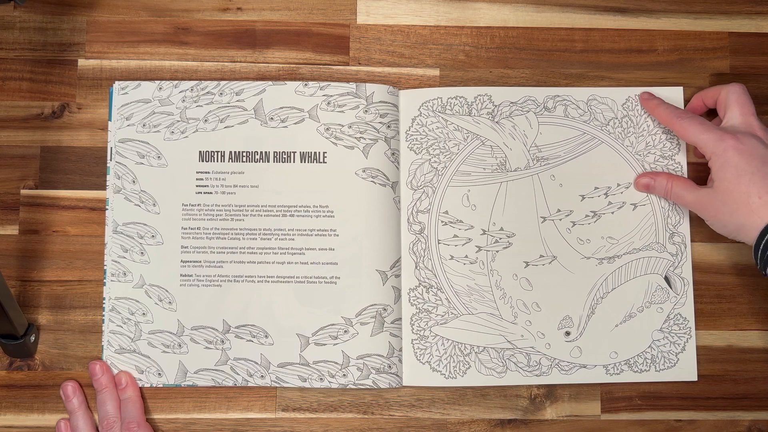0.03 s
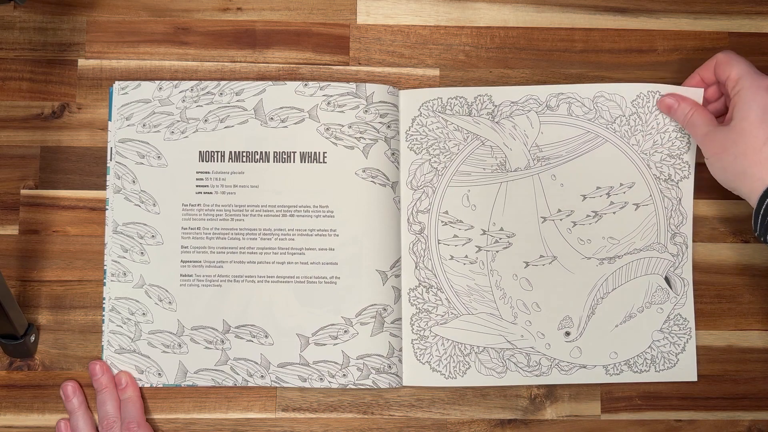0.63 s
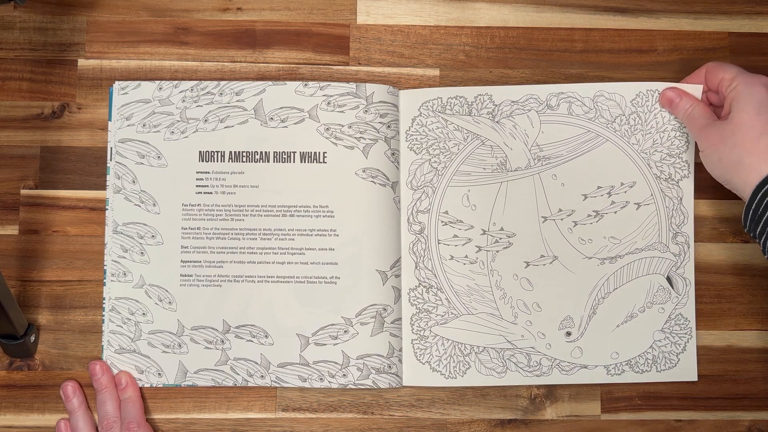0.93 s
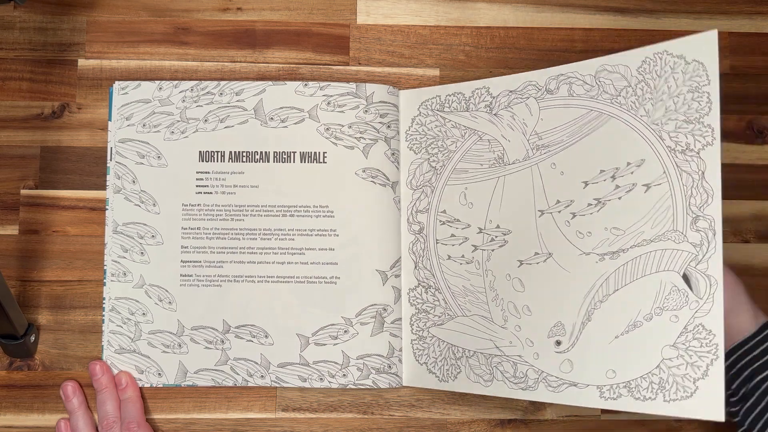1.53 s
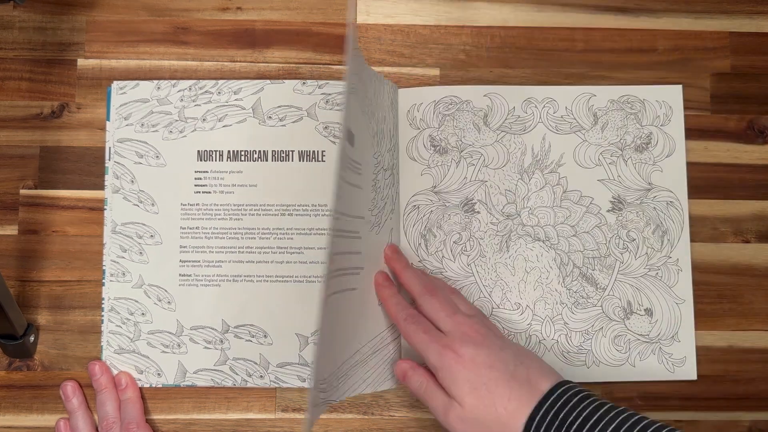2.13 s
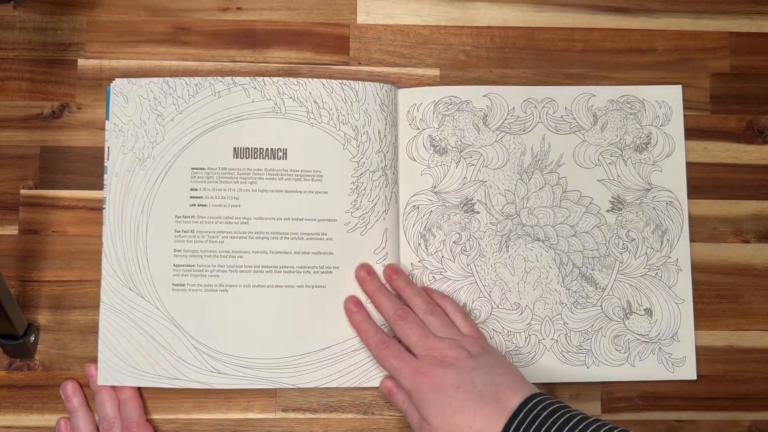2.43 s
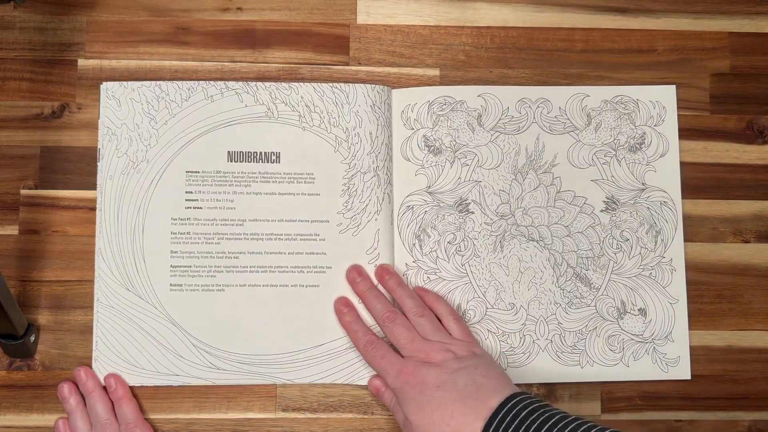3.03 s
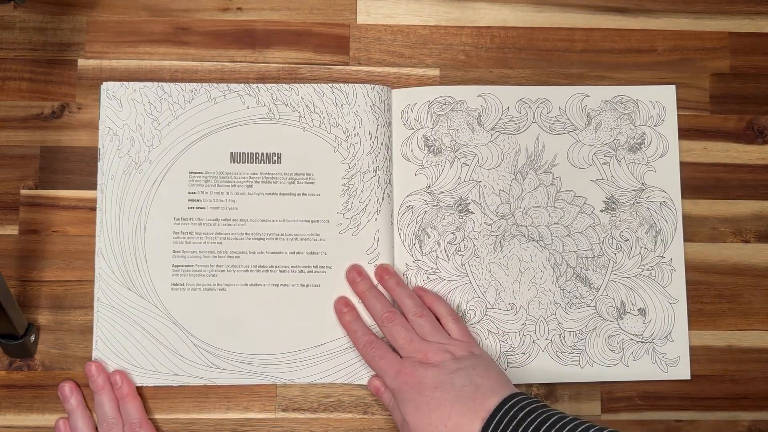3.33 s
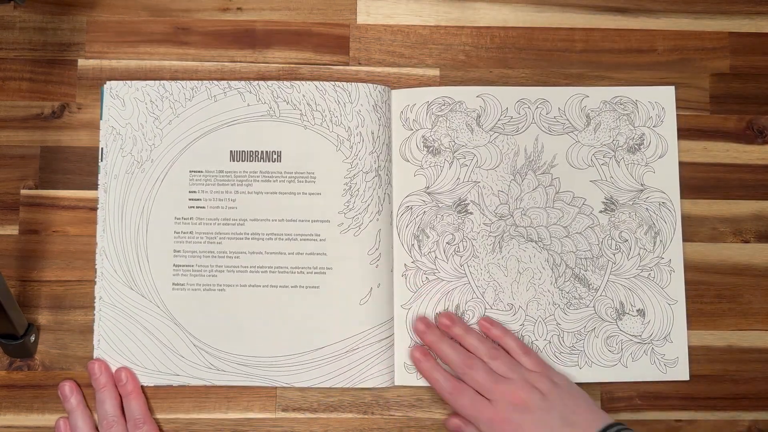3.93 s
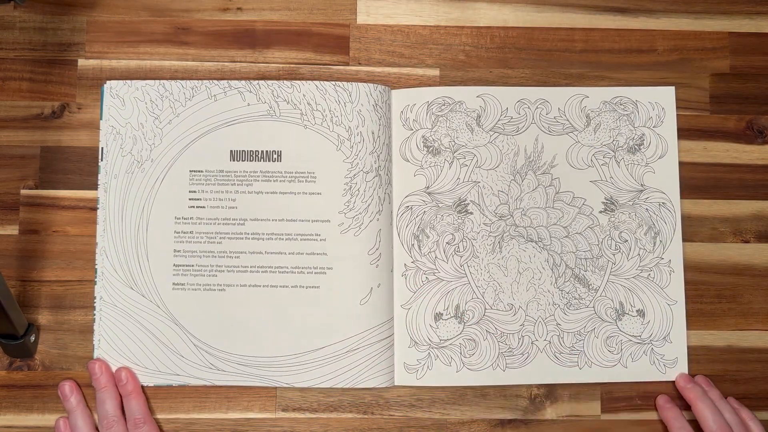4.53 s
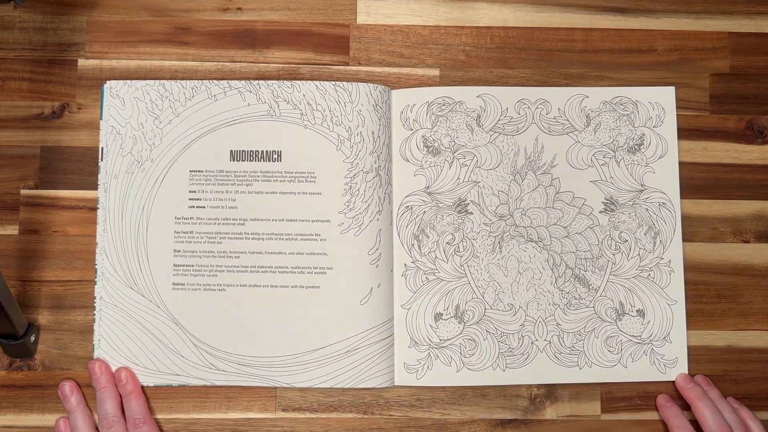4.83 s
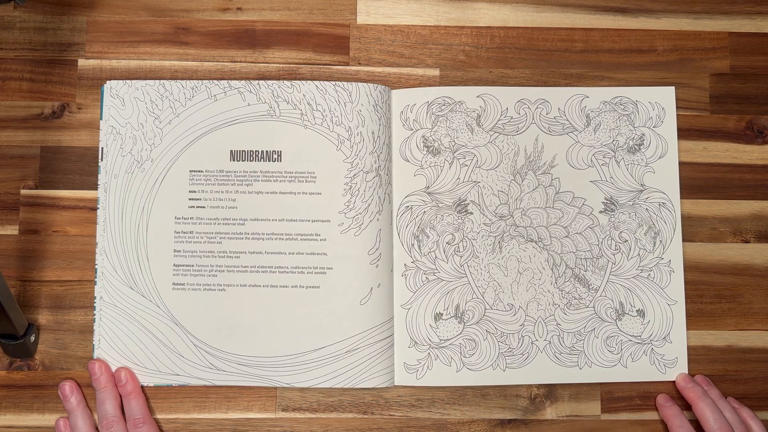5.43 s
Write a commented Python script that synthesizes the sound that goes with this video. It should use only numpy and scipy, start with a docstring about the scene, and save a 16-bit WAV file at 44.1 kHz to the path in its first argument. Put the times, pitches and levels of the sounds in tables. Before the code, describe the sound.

A low ventilation hum and faint hiss run throughout in a quiet room. From about 0.4 seconds a finger rubs the corner of a stiff book page, with small crackles and soft bumps, flicking it free with a sharp snap at 0.8. The hand slides under the sheet with a light hiss. Near 1.5 seconds the paper bends, then buckles at 1.7 in a loud, hollow cluster of pops. It swishes over with a slight rasp, flaps again at 2.1 and lands on a soft puff of air around 2.4. Faint ticks and low palm presses follow, the book resting on a wooden table. From 3.7 seconds the paper pats down and the hand brushes off the page, ending with a bright fingernail tick slightly to the right at 4.3. Everything sounds close, and only the room hum and hiss remain until about 5.5 seconds.

```python
"""A low ventilation hum and faint hiss fill a quiet room; then one stiff page of a large book is turned.
A finger rubs and flicks the corner free, and the hand slides under the sheet, which bends, buckles,
flips over and lands on a puff of air. The hand brushes off the page and a nail ticks its edge.
Friction is heard as streams of tiny clicks, sudden release as damped pulses; these excite the
resonances of the room and of the wooden table under the book."""
import sys
import numpy as np
from scipy import signal
from scipy.fft import rfft, irfft
from scipy.io import wavfile

SR = 44100
rng = np.random.default_rng(int(sys.argv[2]) if len(sys.argv) > 2 else 0)


def materialize(psi):
    """Save the field psi as 16-bit PCM at rate SR to the path in sys.argv[1].

    A 1-D psi becomes a single channel; in a 2-D psi each row is a channel.
    """
    bounded = np.clip(np.atleast_2d(psi).T, -1, 1)
    quanta = np.round(bounded * 32767).astype(np.int16)
    wavfile.write(sys.argv[1], SR, quanta)


N = 250488
T = np.arange(N) / SR
BIN_HZ = np.fft.rfftfreq(N, 1 / SR)


def from_db(db):
    return 10 ** (np.asarray(db) / 20)


def rms_one(x):
    return x / np.sqrt(np.mean(x ** 2) + 1e-20)


def add(out, x, s):
    """Superposition: mix x in from time s."""
    i = int(s * SR)
    out[i:i + len(x)] += x[:N - i]


def colour(x, spectrum):
    """Spectral shaping, falling 20 dB per octave beyond the given points; rms 1."""
    hz, db = np.transpose(spectrum)
    octave, points = np.log2(BIN_HZ + 1), np.log2(hz)
    beyond = abs(octave - np.clip(octave, points[0], points[-1]))
    return rms_one(irfft(rfft(x) * from_db(np.interp(octave, points, db) - 20 * beyond), N))


def band(x, low_hz, high_hz, order=2):
    """Causal band-pass filter."""
    sos = signal.butter(order, [low_hz, min(high_hz, .45 * SR)], "band", fs=SR, output="sos")
    return signal.sosfilt(sos, x)


def drift(per_s):
    """Slow random modulation; rms 1."""
    knots = rng.standard_normal(1 << 14)
    return rms_one(np.interp(T * per_s, np.arange(len(knots)), knots))


def grains(per_s, spread_db):
    """Stick-slip friction: fibres catch and let go in random, uneven clicks; rms 1."""
    sizes = from_db(spread_db * np.minimum(rng.exponential(1, N), 4)) * rng.choice([-1, 1], N)
    return rms_one(sizes * (rng.random(N) < per_s / SR))


def ring(x, hz, t60):
    """A damped resonator with unit gain at its peak."""
    r = from_db(-60 / (t60 * SR))
    feedback = [1, -2 * r * np.cos(2 * np.pi * hz / SR), r * r]
    return signal.lfilter(np.array([1, 0, -1]) * (1 - r * r) / 2, feedback, x + 1e-18)


def burst(envelope, low_hz, high_hz, order=2):
    """Tiny slips sum to band-limited noise with the energy of the envelope."""
    x = band(envelope * rng.choice([-1, 1], len(envelope)), low_hz, high_hz, order)
    return rms_one(x) * np.sqrt(np.mean(envelope ** 2))


def pulse(hz, ratio, order=2):
    """Impulse response of a band around hz: a few damped swings; peak 1."""
    ratio = max(ratio, 1.1)
    x = band(1. * (T[:SR // 10] == 0), hz / ratio, hz * ratio, order)
    return x / abs(x).max()


def strokes(rows):
    """Incoherent strokes rise, hold, fade and add in power; one gain curve per level column."""
    power = 0
    for s, rise_s, hold_s, fade_s, *db in rows:
        rise = np.clip((T - s) / rise_s, 0, 1)
        fade = np.exp(-np.maximum(T - s - rise_s - hold_s, 0) / fade_s)
        power = power + np.outer(from_db(db), rise * fade + 1e-9) ** 2
    return np.sqrt(power)


# Ventilation tones. Each row: frequency in Hz, rms level in dB.
HUM_TONES = [(60, -63.5), (99.5, -82), (119.5, -75.5), (197.5, -77.5), (297, -82), (359, -85.5)]
# Spectra of the rumble and its diffuse part. Each row: frequency in Hz, relative level in dB.
RUMBLE_SPECTRUM = [(20, -40), (32, -21), (45, -13.5), (62, -1.5), (85, -8), (150, -19.5), (250, -25),
                   (350, -31.5), (500, -36), (800, -43.5), (1400, -48), (3000, -56)]
DIFFUSE_SPECTRUM = [(40, -6.5), (70, -1), (130, -3), (200, -2), (350, -5), (550, -6.5), (900, -10.5),
                    (1500, -22), (3500, -24.5)]

def ventilation():
    """Wavering tones over broadband rumble, whose diffuse part differs between the channels."""
    hum = 0
    for hz, db in HUM_TONES:
        amplitude = from_db(db) * np.sqrt(2) * (1 + 0.073 * drift(5.8))
        hum += amplitude * np.sin(2 * np.pi * hz * T + .5 * drift(2.7))
    rumble = from_db(-61.5) * colour(rng.standard_normal(N), RUMBLE_SPECTRUM)
    diffuse = from_db(-75.5) * colour(rng.standard_normal(N), DIFFUSE_SPECTRUM)
    return hum + rumble + diffuse * [[1], [-1]]


# Faint hiss with a gap around 10-13 kHz. Each row: frequency in Hz, relative level in dB.
HISS_SPECTRUM = [(1000, -22), (2000, -11), (3000, -3), (3900, 1), (5000, -9), (6500, 3.5), (8000, 5),
                 (9300, -7), (10300, -24), (12000, -29.5), (15000, -6)]

def background_hiss():
    """Partly coherent noise: one part common to both channels, a weaker part independent."""
    common = from_db(-69) * colour(rng.standard_normal(N), HISS_SPECTRUM)
    return common + from_db(-81) * colour(rng.standard_normal((2, N)), HISS_SPECTRUM)


def room(x, early_db=-15, tail_db=-13, early_s=0.013, t60_s=0.3, treble_db=-4):
    """Reverberation: early reflections off the table, then a short exponential tail."""
    t = T[:SR // 2]
    def reflections():
        echoes = rng.standard_normal((2, len(t))) * (t > .0012)
        early = from_db(early_db) * rms_one(echoes[0] * np.exp(-t / early_s))
        tail = from_db(tail_db) * rms_one(echoes[1] * from_db(-60 * t / t60_s))
        response = (early + tail) / np.sqrt(len(t))
        dull = band(response, 123.2, 4200, order=1)
        return signal.fftconvolve(x, dull + from_db(treble_db) * (response - dull))[:N]
    lateral = reflections()
    side = from_db(5) * band(lateral, 610, 1300, order=1) + from_db(-24.5) * lateral
    return reflections() + side * [[1], [-1]]


# Room resonances. Each row: frequency in Hz, gain in dB, time to fall 60 dB in seconds.
ROOM_MODES = [(472, -7, 0.23), (492, -1, 0.26), (539, 5, 0.18), (620, -7, .25), (682, 1.5, 0.16),
              (830, -2.5, .25), (880, -12, 0.24), (944, -8.5, .18), (1078, -5, .22), (1145, -8.5, .2),
              (1310, -4, .17), (1420, -5.5, 0.11), (1690, -6, 0.11)]

def room_ring(x):
    """Resonance: the room rings briefly after each movement of the page."""
    return x + sum(from_db(db) * ring(x, hz, t60) for hz, db, t60 in ROOM_MODES)


def spread(x, hiss_db=-7, body_db=-9, span_s=0.0013):
    """An extended source: paths from across the page differ a little between the channels."""
    paths = rng.standard_normal(SR // 50) * np.exp(-T[:SR // 50] / span_s)
    wide = from_db(hiss_db) * band(x, 2900, 7000) + from_db(body_db) * band(x, 500, 1000)
    return x + signal.fftconvolve(wide, paths / np.linalg.norm(paths))[:N] * [[1], [-1]]


def from_right(x, lag_s=0.00044):
    """Path difference: sound from the right reaches the left channel later."""
    return np.array([np.interp(T - lag_s, T, x), x])


# Modes of the wood. Each row: frequency in Hz, gain in dB, time to fall 60 dB in seconds.
TABLE_MODES = [(196.5, 6, 0.82), (305, -2, 0.41), (338, 5.5, 0.34), (377, -6.5, 0.3)]

def table_top(x):
    """Forced vibration: whatever touches the book excites the table's modes."""
    return x + sum(from_db(db) * ring(x, hz, t60) for hz, db, t60 in TABLE_MODES)


# Bumps of the hand. Each row: centre in seconds, level in dB, half-width in seconds,
# frequency near the top of the band in Hz.
HAND_BUMPS = [(0.45, -51, 0.036, 58), (0.56, -55, 0.028, 58.4), (0.775, -50, 0.086, 59),
              (1.524, -55, 0.067, 62), (3.389, -50.5, 0.026, 65.3), (3.818, -54, 0.013, 70)]

def thumps():
    """Soft impact: the hand's long contact with the book excites only low frequencies."""
    return sum(from_db(db) * burst(np.exp(-((T - s) / width_s) ** 2) + 1e-9, hz / 8, hz * 1.13)
               for s, db, width_s, hz in HAND_BUMPS)


# Palm presses. Each row: start, rise, hold and fade in seconds, level in dB.
PALM_PRESSES = [(2.58, 0.22, 0.38, 0.13, -62), (3.42, 0.064, 0.088, 0.13, -60),
                (3.72, 0.04, 0.061, 0.062, -62), (4.14, 0.087, 0.035, 0.05, -63.5)]
# Their spectrum. Each row: frequency in Hz, relative level in dB.
PALM_SPECTRUM = [(40, -11), (70, 14.5), (130, -25.5), (200, -1), (330, -10.5), (520, -24.5), (900, -38)]

def palm():
    """Soft friction: the palm shifting on the book makes low noise."""
    return strokes(PALM_PRESSES)[0] * colour(rng.standard_normal(N), PALM_SPECTRUM)


# The sliding edge catching. Each row: start, rise, hold and fade in seconds, rasp and whistle in dB.
EDGE_RASPS = [(1.74, 0.07, 0.14, 0.07, -65, -73), (2.17, 0.07, 0.035, .008, -74, -68),
              (2.325, 0.006, 0.094, 0.016, -74, -66)]

def rasp(coarse_hz=480, whistle_hz=130, glide_hz_per_s=400):
    """Uneven stick-slip puts sidebands around a rising rate: wide ones rasp, narrow ones whistle."""
    hz = 4400 + glide_hz_per_s * (T - 1.9)
    cycle = np.cos(2 * np.pi * np.cumsum(hz) / SR)
    return sum(gain * rms_one(band(grains(4300, 3), 8.6, half_width_hz) * cycle)
               for gain, half_width_hz in zip(strokes(EDGE_RASPS), (coarse_hz, whistle_hz)))


def shimmer(x, bands=14, depth_db=2.5, shifts_per_s=30):
    """Amplitude modulation: the hiss shimmers as its bands swell and fade at random; rms 1."""
    band_of_bin = np.searchsorted(np.geomspace(2000, 11000, bands - 1), BIN_HZ)
    spectrum = rfft(x)
    parts = (irfft(spectrum * (band_of_bin == k), N) for k in range(bands))
    return rms_one(sum(part * from_db(depth_db * drift(shifts_per_s)) for part in parts))


# The sheet swinging over. Each row: time in seconds, level in dB before each layer's offset.
SWING_LEVELS = [(1.66, -51), (1.842, -53.5), (1.848, -54.5), (2.14, -59), (2.162, -55.5), (2.278, -65),
                (2.29, -66)]

def swing_gain(edge_s=0.016):
    """Friction noise follows the sheet's speed, dying away outside the swing."""
    s, db = np.transpose(SWING_LEVELS)
    return from_db(np.interp(T, s, db)) * np.exp(-abs(T - np.clip(T, s[0], s[-1])) / edge_s)


# Rubbing strokes. Each row: start, rise, hold and fade in seconds, then the named levels in dB.
FINGER_STROKES = [(.38, 0.096, 0.03, 0.018, -90, -64.5), (.523, 0.0029, 0.067, 0.041, -60, -54.5),
                  (.59, 0.036, 0.053, 0.0083, -58, -73), (.72, .015, 0.039, 0.01484, -69, -85),
                  (.824, 0.0028, 0.0032, 0.05, -48, -80), (.925, 0.05, 0.0033, 0.02, -58.5, -58.5),
                  (1.0, 0.028, 0.53, .05, -80, -66.5), (1.17, 0.064, .01, 0.036, -76, -61)]  # at the corner and under the page: rub, skin hiss
SHEET_DRAGS = [(1.46, 0.016, 0.063, 0.042, -57, -70, -55.5),
               (1.545, 0.0058, 0.064, 0.025, -52.5, -52.5, -57.5),
               (1.63, 0.0035, 0.0064, 0.016, -46.5, -51.5, -50),
               (2.07, 0.011, 0.19, 0.019, -61.5, -82, -67),
               (2.324, 0.0023, 0.067, 0.13, -65.5, -63.5, -61.5),
               (2.66, 0.08, 0.0024, 0.018, -63, -62, -81.5)]  # over the next page: crease, hiss, wobble
HAND_BRUSHES = [(3.745, 0.042, 0.047, 0.04, -59, -70.5), (3.83, 0.095, 0.059, 0.1, -59, -75),
                (4.10, 0.15, 0.022, 0.022, -64, -79)]  # off the new page: hiss, rub
# Spectra of the friction layers. Each row: frequency in Hz, relative level in dB.
CORNER_SPECTRUM = [(150, -13), (300, 3), (700, -23), (1400, -10.5), (1800, -6), (2150, 0.5), (2750, -1),
                   (3300, -10.5), (4200, -12.5), (5800, -7.5), (9300, -9.5), (12000, -49.5)]
CREASE_SPECTRUM = [(700, -18), (1400, -4), (2200, 1.5), (3000, -1.5), (4200, -5), (5500, -5.5),
                   (9300, -6.5), (12000, -26)]
SLIDE_SPECTRUM = [(300, -30), (700, -22), (1400, -10), (2200, -12.5), (3200, -6.5), (4300, -5), (5300, -1),
                  (7500, 2), (9300, 4), (11500, -11.5), (15000, -5), (16000, 2.5)]
BEND_SPECTRUM = [(30, -15), (60, -6.5), (180, 7), (300, 1), (500, -7), (720, -2), (1000, -7), (1500, -9),
                 (2500, -32.5)]
BRUSH_SPECTRUM = [(150, -7.5), (330, 3), (600, -19), (1400, -14), (2200, -13), (4300, -14), (5500, -7),
                  (7500, -1.5), (9300, -0.5), (11500, -11), (15000, -3), (16000, -5)]

def friction():
    """Dense stick-slip clicks merge into rubbing noise; fluttering pressure modulates the hiss."""
    rub, skin = strokes(FINGER_STROKES)
    creasing, drag, wobble = strokes(SHEET_DRAGS)
    brushing, brush_rub = strokes(HAND_BRUSHES)
    swing = swing_gain()
    crease_gain = np.hypot(creasing + brush_rub, from_db(-11) * swing)
    slide_gain = np.hypot(skin + drag, from_db(-0.5) * swing)
    bend_gain = np.hypot(wobble + from_db(-19.5) * brushing, from_db(-8.5) * swing)
    corner = rub * colour(grains(per_s=5800, spread_db=4), CORNER_SPECTRUM)
    crease = crease_gain * colour(grains(9000, 0.5), CREASE_SPECTRUM)
    slide = slide_gain * shimmer(colour(grains(9400, 2.5), SLIDE_SPECTRUM))
    bend = room_ring(bend_gain * colour(grains(5100, -0.5), BEND_SPECTRUM))
    brush = brushing * colour(grains(22000, -1.5), BRUSH_SPECTRUM)
    press = palm()
    grit = from_db(-6.5) * drag * colour(grains(450, 0.5), SLIDE_SPECTRUM)  # coarse fibres
    pressure = from_db(0.81 * drift(per_s=70))
    swells = from_db(1.5 * drift(per_s=45))
    return corner + crease * swells + bend + press + grit + (slide + brush + rasp()) * pressure


def nail(at_s=4.2907, graze_s=0.0011, skid_s=0.0052, knock_s=0.0073, body_s=0.0077):
    """Hard impact: a nail's brief contact ticks brightly, knocks the page block and skids along it."""
    out, t = np.zeros(N), T[:SR // 10]
    tick = from_db(-29.5) * pulse(9000, 1.5)
    edge_ring = from_db(-43) * pulse(4500, 1.1)
    contact = np.exp(-np.maximum((at_s - T) / graze_s, (T - at_s) / skid_s))
    skid = from_db(-50.5) * burst(contact + 1e-9, 2900, 9500)
    knock = from_db(-55) * burst(np.exp(-t / knock_s), 2400, 6100)
    body = from_db(-53) * burst(np.exp(-t / body_s), 730, 1480)
    add(out, tick + edge_ring + knock + body, at_s)
    return out + skid


# Air pushed by the sheet. Each row: start in seconds, peak level in dB, frequency in Hz.
AIR_PUFFS = [(1.431, -51.5, 160.3), (1.502, -44, 120), (1.518, -39.5, 169), (1.649, -34.5, 57.6),
             (1.665, -49, 121), (1.678, -38.5, 228), (1.685, -47, 131.4), (1.700, -54, 126.7),
             (1.764, -45.5, 74), (1.780, -51, 190), (2.384, -46, 161)]

def puffs():
    """Air displacement: each shove of the sheet radiates one low pressure pulse."""
    out = np.zeros(N)
    for s, db, hz in AIR_PUFFS:
        add(out, from_db(db) * pulse(hz, ratio=2.14), s)
    return out


# The edge slipping off a finger or page. Each row: start in seconds, snap, crackle and thud in dB.
EDGE_SNAPS = [(0.527, -53, -52.5, -69), (0.6456, -48, -53, -53), (0.667, -59, -52.5, -49),
              (0.6728, -47, -47.5, -61), (0.717, -39, -45, -53), (0.7201, -36, -45.5, -46.5),
              (0.7241, -53, -45, -53), (0.7277, -45, -63, -54), (0.7626, -32, -37.5, -41),
              (0.7645, -36, -49, -47), (0.7693, -39, -43, -43), (.8184, -44, -68.5, -51),
              (0.8269, -20, -38, -34), (1.2305, -61, -59, -67), (1.6636, -36, -70.5, -57),
              (1.7468, -61, -47, -74), (2.0891, -42, -66, -57), (2.3255, -72, -56, -74),
              (2.4996, -56, -51, -54.5), (2.5404, -51, -53.5, -73), (2.7446, -55, -58, -72),
              (3.3785, -57, -64, -84), (3.7812, -64, -48, -59)]

def snaps(scrape_s=0.0027, shake_s=0.015):
    """Elastic release: the edge springs back, scrapes, thuds on the pages below and shakes the sheet."""
    out, t = np.zeros(N), T[:SR // 10]
    for s, snap_db, crackle_db, thud_db in EDGE_SNAPS:
        snap = from_db(snap_db) * pulse(2077, 1.194)
        crack = from_db(6) * pulse(7000, 1.7)
        scrape = burst(np.exp(-t / scrape_s), 700, 9100, order=1)
        shake = from_db(-10.5) * burst(np.exp(-t / shake_s), 230, 620)
        thud = pulse(360, 1.46) + shake
        add(out, snap + from_db(crackle_db) * (crack + scrape) + from_db(thud_db) * thud, s)
    return out


def buckle(at_s=1.6633, jolts=4, gap_s=0.002, first_db=-20.5, loss_db=3.6):
    """Snap-through buckling: the bowed sheet breaks over in a run of ever softer jolts."""
    out = np.zeros(N)
    for k in range(jolts):
        add(out, from_db(first_db - loss_db * k) * pulse(700, 1.97, order=4), at_s + k * gap_s)
    return out


# The sheet lifting, flipping and landing. Each row: peak time in seconds, level in dB,
# rise and decay in seconds, centre frequency in Hz, ratio of band edge to centre.
SHEET_FLEXES = [(.828, -39, 0.00037, 0.0025, 1100, 1.54), (1.432, -53.5, .016, 0.03, 395, 1.7),
                (1.451, -51.5, 0.0067, 0.069, 710, 1.4), (1.655, -39.5, 0.0088, 0.017, 886, 1.57),
                (1.666, -33.5, 0.0047, 0.0057, 737, 1.35), (1.67, -44.5, 0.01, 0.014, 1591, 1.45),
                (1.688, -43.5, .008, 0.01397, 640, 1.73), (1.709, -41.5, .01, 0.0083, 544, 1.59),
                (2.0892, -37, 0.00054, .0105, 1210, 1.68), (2.1, -51, 0.0025, .0074, 860, 1.34),
                (2.329, -62, .0016, .008, 680, 1.5), (2.37, -45, 0.012, 0.0093, 620, 1.64),
                (2.38, -56, .008, 0.01, 1400, 1.24), (2.385, -43.5, 0.0041, 0.014, 620, 1.63),
                (2.525, -62.5, 0.009, 0.011, 806, 1.62), (2.750, -64.5, 0.013, 0.0077, 670, 1.13),
                (3.379, -68, .002, 0.0074, 1900, 1.26), (3.733, -56.5, .0015, 0.013, 755, 1.67),
                (3.785, -56.5, 0.0055, 0.013, 650, 2.04)]
# The paper popping into shape or patting down. Each row: start in seconds, peak level in dB,
# centre frequency in Hz, ratio of band edge to centre.
SHEET_POPS = [(1.451, -53, 660, 0.93), (1.646, -33.5, 605, 1.7), (1.651, -26, 670, 1.8),
              (1.658, -32, 734, 1.6), (1.677, -29, 645, 2.3), (1.6838, -36.5, 640, 1.6),
              (1.694, -35, 620, 1.8), (1.7075, -34, 545, 1.17), (1.735, -40, 560, 1.24),
              (2.0886, -28.5, 1090, 1.8), (2.0945, -34.5, 860, 1.53), (2.099, -34, 1200, 1.06),
              (2.3285, -44, 700, 1.2), (2.3745, -32, 580, 1.55), (2.3815, -36, 700, 1.11),
              (3.7315, -44.5, 790, 1.28), (3.737, -50, 620, 2.5), (3.781, -49.5, 950, 1.5),
              (3.786, -45.5, 754, 1.16), (3.7915, -51, 480, 1.6)]

def flexes(flutter_longer=2.3, flutter_pitch=0.77, wobble_db_per_octave=-5.5):
    """Flexural vibration: the stiff sheet gives way in dull swells, pops over and flutters on."""
    out, t = buckle(), T[:SR // 2] - .1
    for s, db, rise_s, decay_s, hz, ratio in SHEET_FLEXES:
        low_hz, high_hz = hz / ratio, hz * ratio
        swell = np.exp(-np.where(t < 0, -t / rise_s, t / decay_s))
        lingering = np.exp(-np.where(t < 0, -t / rise_s, t / (decay_s * flutter_longer)))
        flutter = from_db(-9.5) * burst(lingering, flutter_pitch * low_hz, flutter_pitch * high_hz, 3)
        wobble_db = -6.5 + wobble_db_per_octave * np.log2(hz / 400)  # deeper flexes wobble more
        wobble = from_db(wobble_db) * burst(lingering, 170, 400)
        flex = burst(swell, low_hz, high_hz, order=4)
        add(out, from_db(db) * (flex + flutter + wobble), s + t[0])
    for s, db, hz, ratio in SHEET_POPS:
        add(out, from_db(db) * pulse(hz, ratio, order=3), s)
    return room_ring(out)


def scene():
    """Superposition of the sound of page and nail, its reverberation and the background."""
    rubbing = table_top(friction())
    blows = table_top(snaps() + flexes() + puffs() + thumps())
    tick = nail()
    near = spread(rubbing) + blows + from_right(tick)
    return near + room(rubbing + blows + tick) + ventilation() + background_hiss()


# Left-right phase; the channels oppose around 11-14 kHz.
# Each row: frequency in Hz, lead of the left channel in radians.
CHANNEL_PHASE = [(0, 0), (2000, 0), (4400, -.3), (4680, -.8), (4900, -3.1), (5200, -5.5), (6000, -6.28),
                 (8000, -7.2), (10200, -8.4), (11300, -9.3), (13600, -9.5), (15300, -10.5)]

def record(dry, low_cut_hz=38, high_cut_hz=15900):
    """Phase shift and band limiting: the left treble lags; the deepest bass and the top are cut."""
    lead = np.interp(BIN_HZ, *np.transpose(CHANNEL_PHASE))
    left = irfft(rfft(dry[0]) * np.exp(1j * lead), N)
    pair = signal.sosfilt(signal.butter(5, low_cut_hz, "high", fs=SR, output="sos"), [left, dry[1]])
    return signal.sosfilt(signal.ellip(10, .1, 70, high_cut_hz, fs=SR, output="sos"), pair)


dry = scene()
out = record(dry)
materialize(out)
```